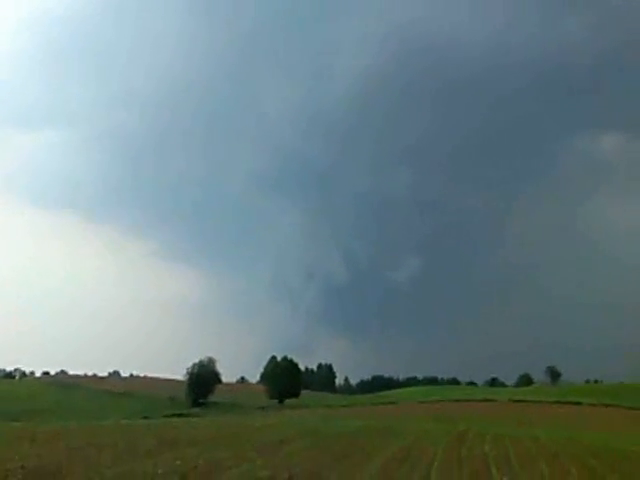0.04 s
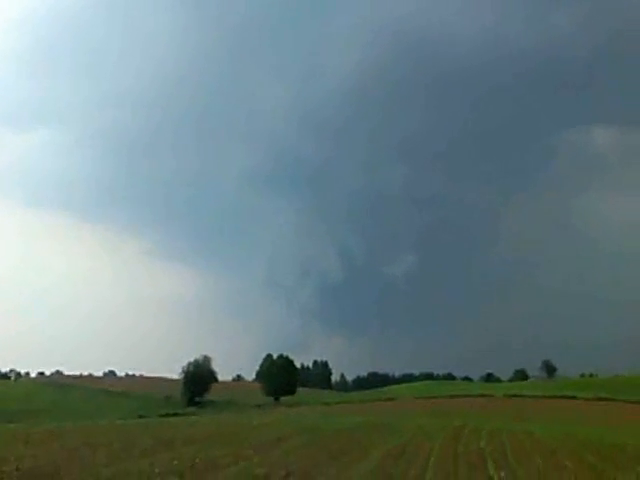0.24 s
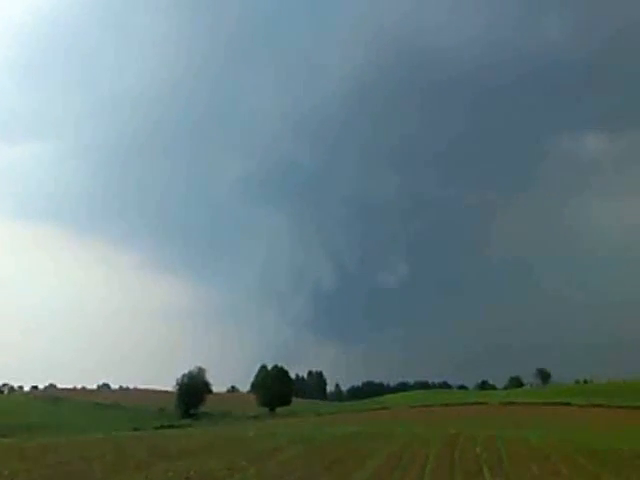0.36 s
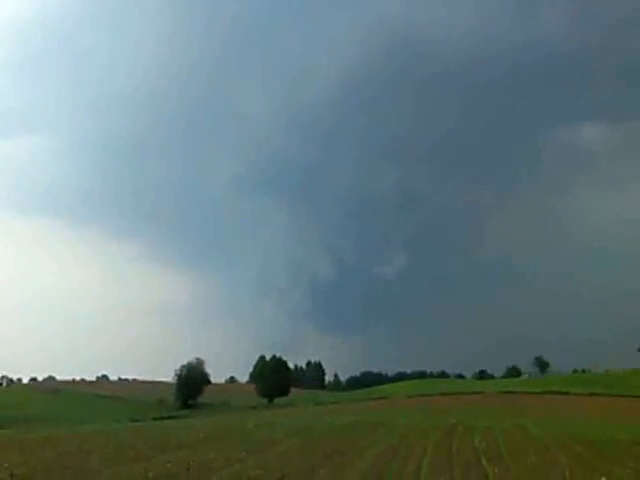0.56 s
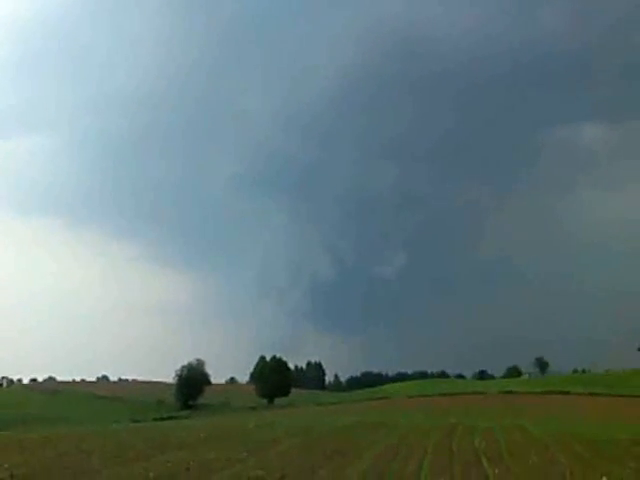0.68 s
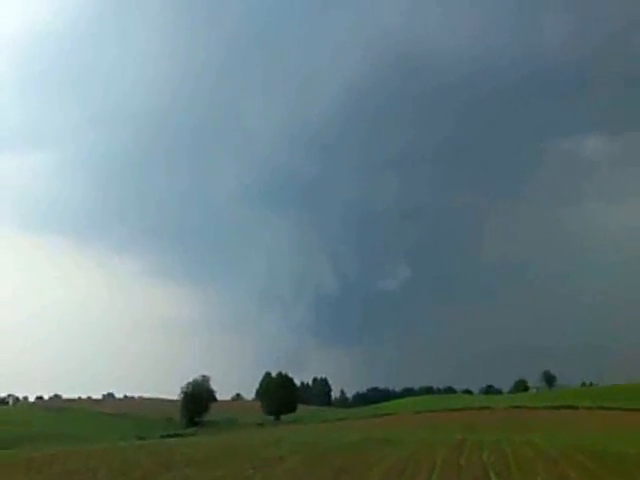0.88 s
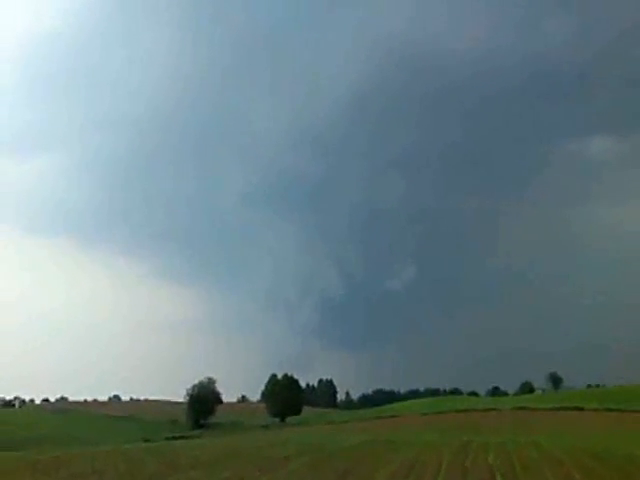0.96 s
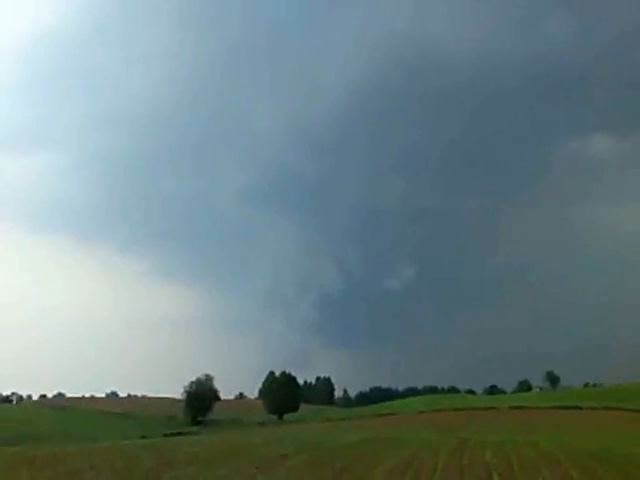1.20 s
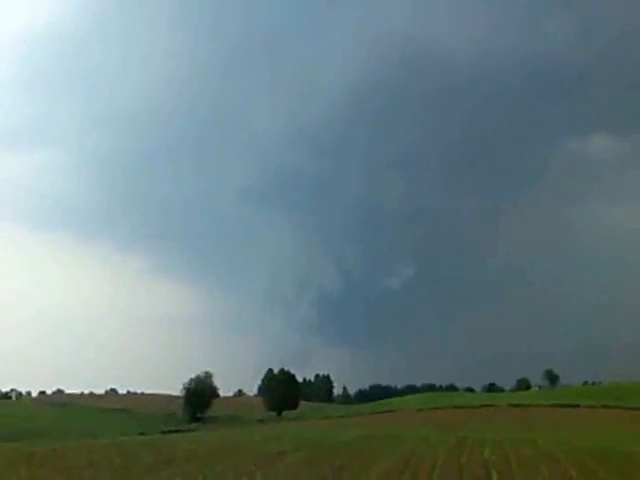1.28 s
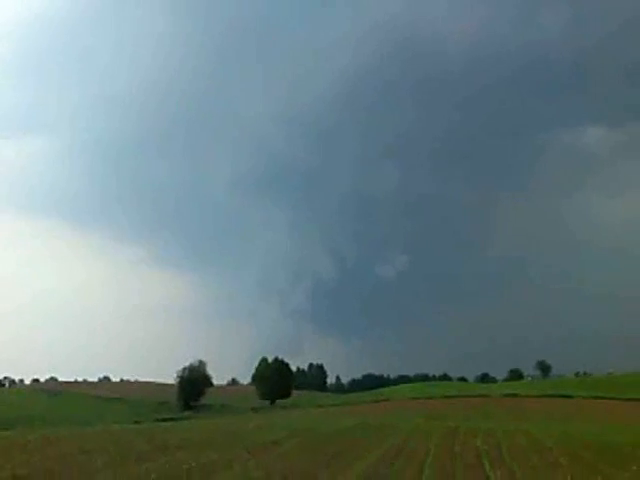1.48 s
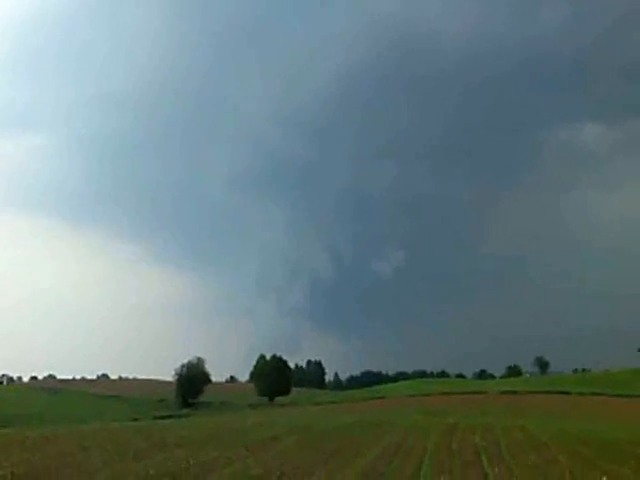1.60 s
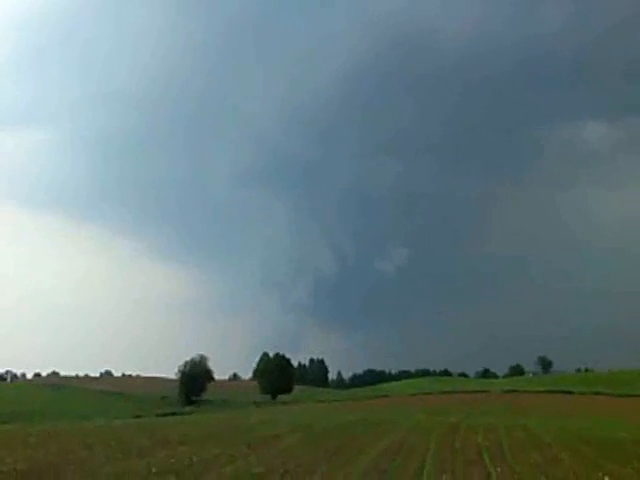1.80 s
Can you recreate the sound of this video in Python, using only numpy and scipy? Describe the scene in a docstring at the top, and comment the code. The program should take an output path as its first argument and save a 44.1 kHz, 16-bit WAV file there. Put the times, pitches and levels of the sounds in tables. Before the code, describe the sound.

A sudden thunder crack over open fields, a second peak, then a low fading roll

```python
"""Open fields under thunder: faint rumble, a sudden crack, a second peak and a fading roll.
Shock waves from every bend of the channel arrive in dense random showers; the strongest groups are booms,
each a short ringing pulse. A faint breathy whistle sinks under the opening.
A small camera microphone loses deep bass and clips the peaks; shaped noise makes the hiss, mostly below 4 kHz,
and steady sines make a thin electronic whine."""
import sys
import numpy as np
from scipy import signal
from scipy.fft import rfft, irfft
from scipy.io import wavfile
from scipy.ndimage import uniform_filter1d

SR = 44100
rng = np.random.default_rng(int(sys.argv[2]) if len(sys.argv) > 2 else 0)


def log_audio(samples):
    """Write samples as a 16-bit WAV file to the path given in sys.argv[1]."""
    # one column per channel
    frames = np.atleast_2d(samples).T
    # limit to full scale, then quantise
    limited = np.clip(frames, -1, 1)
    pcm = np.round(limited * 32767).astype(np.int16)
    wavfile.write(sys.argv[1], SR, pcm)


def gain_from_db(level_db):
    """Turn a decibel level (scalar or array-like) into a linear amplitude factor."""
    decades = np.asarray(level_db, float) / 20
    return 10 ** decades


N = 81585

# Thunder reaching the microphone:
# (time [s], short-shock level [dB], long-shock level [dB re short], sharp-edge level [dB re short])
ROLL_ARRIVALS = [(0.0, -51, 10, -9.5), (0.184, -49, 10, -3), (0.206, -36, 10, -12.5),
                 (0.22, -43, 12.5, -4.5), (0.242, -24.5, 3, -10), (0.262, -23, 9.5, -15),
                 (0.298, -16, 2, -13.5), (0.326, -20, 14.5, -16.5), (0.339, -13, 2.5, -19),
                 (0.468, -17, 11, -14), (0.549, -13.5, 1, -20), (0.572, -16.5, 8, -17),
                 (0.632, -19, 0.5, -16.5), (0.762, -25.5, 6, -13.5), (0.798, -26.5, 9, -16.5),
                 (0.818, -19, 0, -16), (0.9, -15, 2.5, -14.5), (0.952, -13, -1.5, -15.5),
                 (1.06, -20.5, 0.5, -13), (1.128, -22.5, 0, -18.5), (1.256, -29.5, 9, -15.5),
                 (1.49, -32, 2.5, -15.5), (1.55, -33, 5, -15.5), (1.85, -38.5, 5.5, -11.5)]
# Crackle of short shocks after air and ground: (frequency [Hz], relative level per Hz [dB])
CRACKLE_COLOUR = [(60, -31), (150, -9), (300, 0), (450, -4), (550, -7), (800, -9.5), (1100, -37.5),
                  (1600, -41), (3000, -85), (9000, -130)]
# Sharp edges of the same short shocks: (frequency [Hz], relative level per Hz [dB])
EDGE_COLOUR = [(500, -24), (1000, 5.5), (1500, -2), (2200, -14.5), (3500, -29), (4300, -31.5), (5000, -61),
               (9000, -110)]
# Deep rumble of long shocks: (frequency [Hz], relative level per Hz [dB])
DEEP_COLOUR = [(20, -30.5), (45, -25.5), (70, -7.5), (110, -2), (170, -3.5), (260, -7), (400, -14.5),
               (800, -78.5), (3000, -130)]
SHORT_PER_S, LONG_PER_S = 2500, 500  # mean shocks per second
BOOM_LIFT_DB = 2.5  # swell of the sharp edges in a boom


def thunder(t):
    """Short and long shocks follow the roll; fronts kick crackle and edges; booms stand on top."""
    time, level_db, deep_db, edge_db = np.array(ROLL_ARRIVALS, float).T
    boom, boom_shape = booms(t)
    short = shocks(SHORT_PER_S)
    short_db = np.interp(t, time, level_db) + front_kick_db(t)
    crackle = travelled(short, short_db, CRACKLE_COLOUR)
    sharp_db = short_db + np.interp(t, time, edge_db) + BOOM_LIFT_DB * boom_shape
    edges = travelled(short, sharp_db, EDGE_COLOUR)
    rumble_db = np.interp(t, time, level_db + deep_db)
    rumble = travelled(shocks(LONG_PER_S), rumble_db, DEEP_COLOUR)
    return boom + crackle + edges + rumble


# Groups of strong shocks: (centre time [s], peak level [dB], pitch [Hz], length [s])
BOOM_GROUPS = [(0.019, -25, 87.6, 0.026), (0.112, -24, 131, 0.025), (0.206, -19, 357, 0.0057),
               (0.216, -15, 141, 0.019), (0.246, -7, 397, 0.012), (0.278, -9, 314, 0.011),
               (0.314, -8.5, 174.7, 0.018), (0.34, 2.5, 343, 0.0065), (0.344, 0.5, 403, 0.006),
               (0.352, 1, 229.4, 0.0066), (0.369, -4, 295, 0.0032), (0.376, 2.5, 324, 0.011),
               (0.384, 1.5, 240, 0.0053), (0.393, 4, 200.5, 0.011), (0.408, 0.5, 340.4, 0.01),
               (0.418, -0.5, 232.3, 0.0046), (0.432, 2, 171, 0.014), (0.445, 0, 220.0, 0.019),
               (0.462, 0, 143, 0.019), (0.489, 1.5, 301, 0.015), (0.514, -2, 144, 0.0046),
               (0.517, -3, 247, 0.0065), (0.53, -3, 303.7, 0.011), (0.558, -7, 237.3, 0.022),
               (0.585, -3, 152.3, 0.021), (0.592, -4.5, 333, 0.017), (0.621, -1, 245, 0.009),
               (0.644, -11.5, 335.7, 0.043), (0.696, -15.5, 356, 0.0039), (0.775, -8.5, 186, 0.013),
               (0.806, -11, 207, 0.019), (0.83, -8.5, 345, 0.031), (0.854, -5.5, 303, 0.019),
               (0.912, -1.5, 305, 0.013), (0.9316, 0.5, 254, 0.011), (0.975, 0.5, 230.6, 0.0063),
               (0.9893, -2.5, 288.4, 0.018), (1.005, -2.5, 262.5, 0.012), (1.015, 2, 217, 0.0055),
               (1.023, -5.5, 265, 0.0094), (1.052, -5.5, 276, 0.013), (1.071, -5, 226, 0.011),
               (1.135, -11.5, 228.8, 0.057), (1.169, -13, 183, 0.028), (1.193, -11.5, 250, 0.0054),
               (1.224, -16.5, 245.6, 0.05), (1.29, -16, 175, 0.035), (1.322, -20, 268, 0.09),
               (1.387, -21.5, 170, 0.013), (1.393, -22.5, 305, 0.016), (1.437, -33, 271, 0.011),
               (1.459, -10.5, 205, 0.005), (1.553, -26, 96, 0.14)]
BOOM_SPREAD = 0.33  # envelope sigma as a share of the length
BOOM_WAVER = 0.2  # largest pitch glide, as a phase stretch at one length from the centre


def booms(t):
    """Each group rings for a few cycles around one pressure crest; also returns their envelopes."""
    out, boom_shape = np.zeros(N), np.zeros(N)
    glides = 2 * rng.random(len(BOOM_GROUPS)) - 1  # falling or rising pitch
    for (centre, db, hz, length), glide in zip(BOOM_GROUPS, glides):
        d = t - centre
        shape = np.exp(-0.5 * (d / (BOOM_SPREAD * length)) ** 2)
        stretch = 1 + BOOM_WAVER * glide * d / length
        out += gain_from_db(db) * shape * np.cos(2 * np.pi * hz * d * stretch)
        boom_shape = np.maximum(boom_shape, shape)
    return out, boom_shape


# Sudden fronts of short shocks: (time [s], jump [dB])
SHOCK_FRONTS = [(0.202, 10), (0.336, 4.5), (0.491, 5), (0.695, 6.5), (0.815, 5), (0.903, 1.5)]
FRONT_FADE_S = 0.022


def front_kick_db(t):
    """Each front lifts the shock level at once, and the lift dies away exponentially."""
    kick_db = np.zeros(N)
    for at, jump_db in SHOCK_FRONTS:
        kick_db += jump_db * (t >= at) * np.exp(-np.abs(t - at) / FRONT_FADE_S)
    return kick_db


def shocks(per_s):
    """Random shower of pressure jumps, up or down, with long-tailed sizes."""
    chance, side, size = rng.random((3, N))
    size_db = -1.5 * np.log(1 - size)  # exponential scatter, mean 1.5 dB
    return (chance < per_s / SR) * np.sign(side - 0.5) * gain_from_db(size_db)


def travelled(jumps, db, table):
    """Jumps at level db, coloured by their path; the unlevelled coloured shower sets the scale."""
    return colour(jumps * gain_from_db(db), table) / np.std(colour(jumps, table))


def colour(x, table):
    """Causal minimum-phase filter from (frequency [Hz], level [dB]) points, by the folded cepstrum."""
    hz, db = np.array(table, float).T
    size = 2 ** 13
    bins_hz = np.arange(size // 2 + 1) * SR / size
    gain = gain_from_db(np.interp(np.log(bins_hz + 1), np.log(hz), db))
    cepstrum = irfft(np.log(gain))
    cepstrum[1:size // 2] *= 2
    cepstrum[size // 2 + 1:] = 0
    impulse = irfft(np.exp(rfft(cepstrum)))[:size // 2]
    return signal.fftconvolve(x, impulse)[:N]


# Faint sinking whistle: (time [s], pitch [Hz], level of the steady part [dB])
WHISTLE_PATH = [(0, 2090, -49), (.04, 2070, -52), (.052, 2065, -63), (.125, 2040, -55), (.14, 2030, -66),
                (.18, 1995, -58), (.21, 1980, -68)]
WHISTLE_WIDTH_HZ, WHISTLE_BREATH = 150, 0.45  # breath: noise relative to the steady tone


def whistle(t):
    """A narrow tone, made breathy by slow noise on both its phases, that sinks and fades unevenly."""
    time, hz, db = np.array(WHISTLE_PATH, float).T
    in_phase, across = slow_noise(WHISTLE_WIDTH_HZ), slow_noise(WHISTLE_WIDTH_HZ)
    phase = 2 * np.pi * np.cumsum(np.interp(t, time, hz)) / SR
    tone = (1 + WHISTLE_BREATH * in_phase) * np.sin(phase) + WHISTLE_BREATH * across * np.cos(phase)
    level = gain_from_db(np.interp(t, time, db, right=-120))
    return level * tone * np.sqrt(2)


def slow_noise(rate_hz):
    """Noise of rms 1, smoothed twice over 1/rate_hz seconds."""
    k = int(SR / rate_hz)
    return unit(uniform_filter1d(uniform_filter1d(rng.standard_normal(N), k), k))


def unit(x):
    """Scale to rms 1."""
    return x / np.sqrt(np.mean(x ** 2))


# Field air and microphone hiss: (frequency [Hz], relative level per Hz [dB])
HISS_COLOUR = [(25, 8.5), (60, 17), (300, 3), (1000, -15), (1500, 1), (3380, 0), (4000, -7.5),
               (4850, -23.5), (7200, -25), (9500, -26.5), (11000, -19), (12500, -23.5), (13200, -48.5)]
HISS_DB, HISS_FLICKER_DB, HISS_FLICKER_PER_S = -50, 1.2, 60  # flicker in dB rms


def hiss():
    """Steady coloured noise whose level flickers a little."""
    level_db = HISS_DB + HISS_FLICKER_DB * slow_noise(HISS_FLICKER_PER_S)
    return gain_from_db(level_db) * unit(colour(rng.standard_normal(N), HISS_COLOUR))


# Whine of the electronics: (frequency [Hz], level [dB rms])
WHINE_TONES = [(8269, -79), (9647, -83), (11025, -68), (12403, -82)]


def whine(t):
    """Steady sines of the electronics."""
    return sum(gain_from_db(db) * np.sqrt(2) * np.sin(2 * np.pi * hz * t) for hz, db in WHINE_TONES)


def scene():
    """Thunder, whistle and hiss at one microphone."""
    t = np.arange(N) / SR
    return (thunder(t) + whistle(t) + hiss())[None]


def low_pass(x):
    """Removes everything above the highest recorded frequency."""
    return signal.sosfilt(signal.butter(12, 15700, fs=SR, output="sos"), x)


CEILING = 0.89  # clipping level, full scale 1
BASS_CUT_HZ, SMOOTH_HZ = 53, 15300


def record(dry):
    """The capsule loses deep bass; the input stage clips hard, rolls off the top and whines."""
    t = np.arange(N) / SR
    thin = signal.lfilter(*signal.butter(1, BASS_CUT_HZ, "high", fs=SR), dry)
    clipped = np.clip(thin, -CEILING, CEILING)
    soft = signal.sosfilt(signal.butter(2, SMOOTH_HZ, fs=SR, output="sos"), clipped)
    return low_pass(soft + whine(t))


dry = scene()
out = record(dry)
log_audio(out)
```